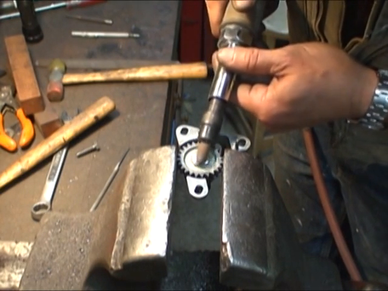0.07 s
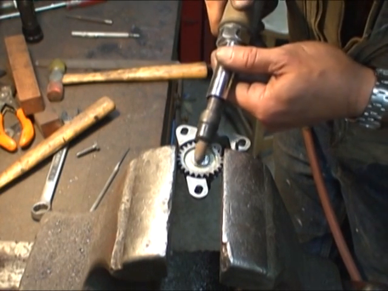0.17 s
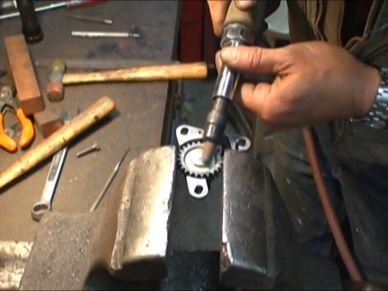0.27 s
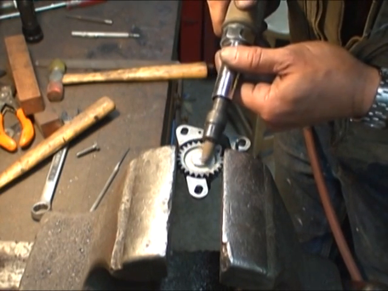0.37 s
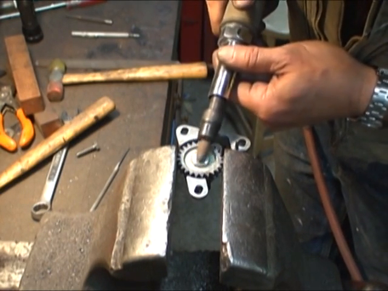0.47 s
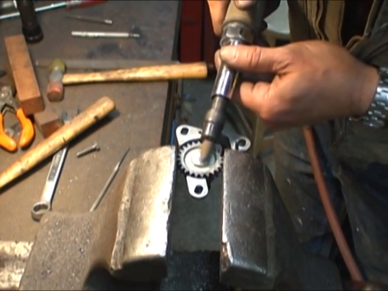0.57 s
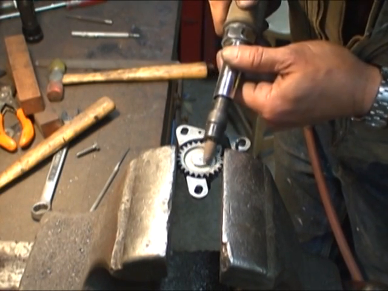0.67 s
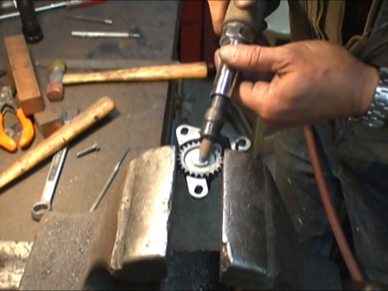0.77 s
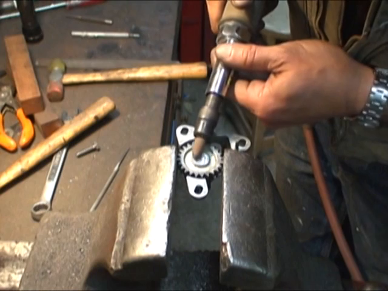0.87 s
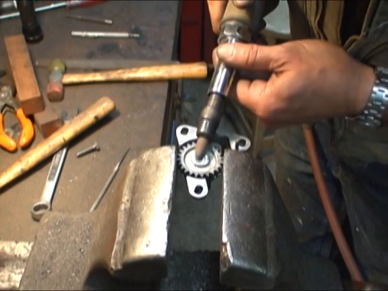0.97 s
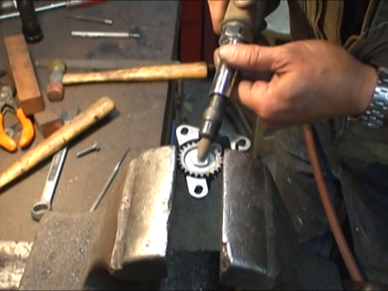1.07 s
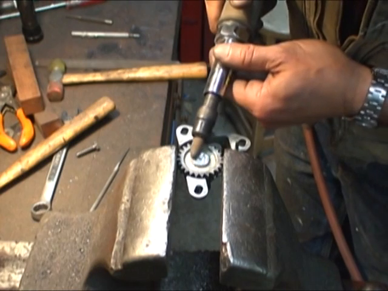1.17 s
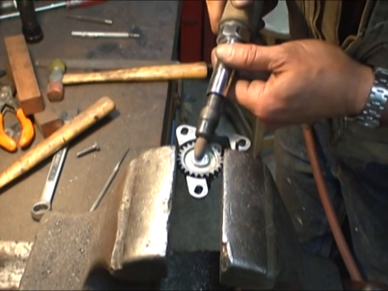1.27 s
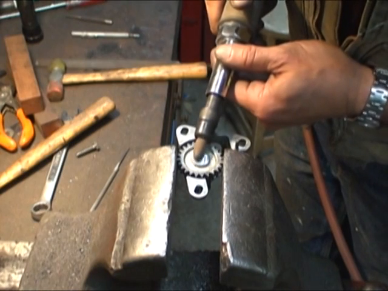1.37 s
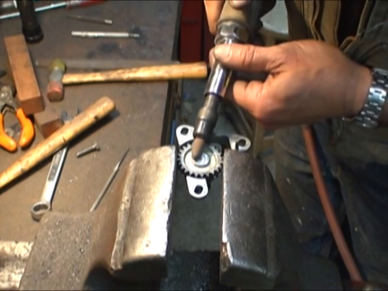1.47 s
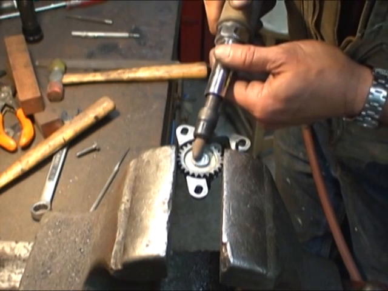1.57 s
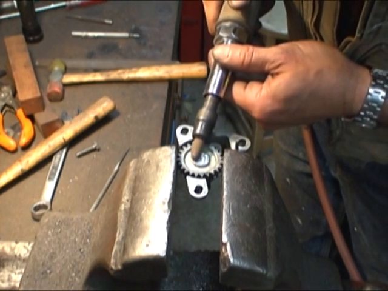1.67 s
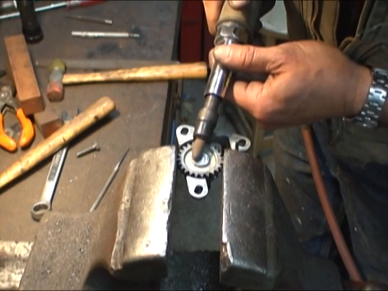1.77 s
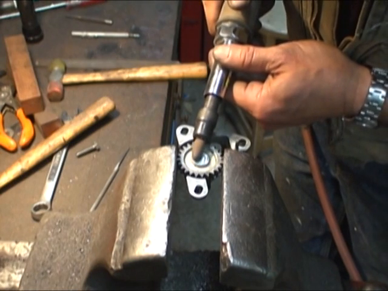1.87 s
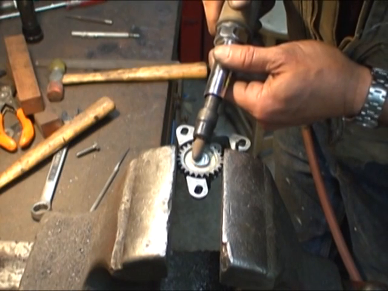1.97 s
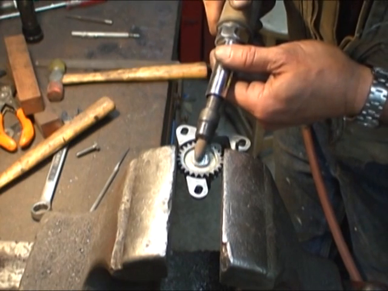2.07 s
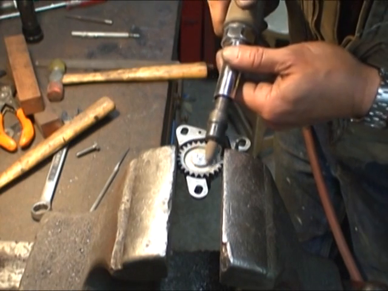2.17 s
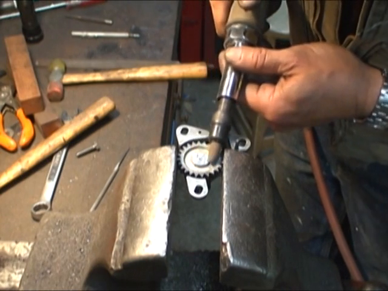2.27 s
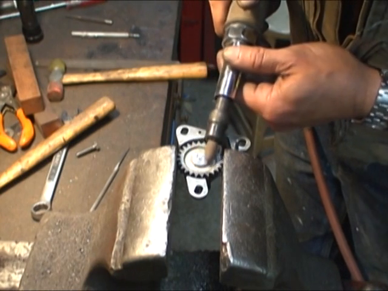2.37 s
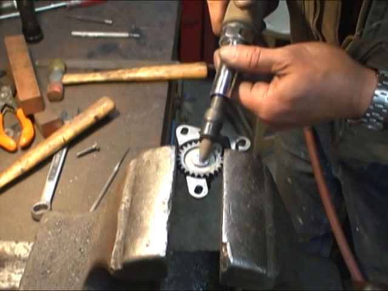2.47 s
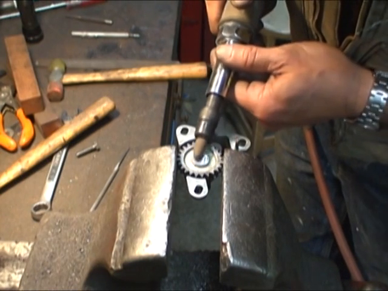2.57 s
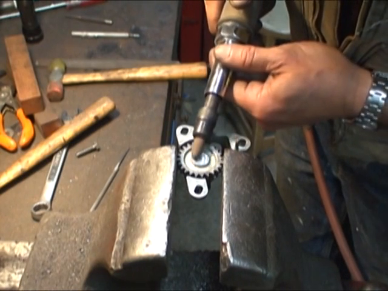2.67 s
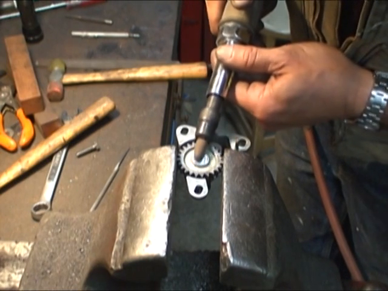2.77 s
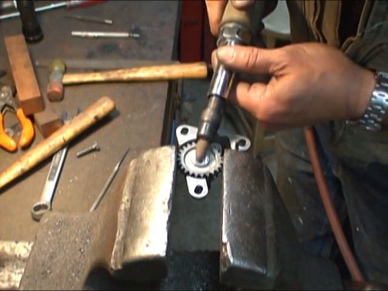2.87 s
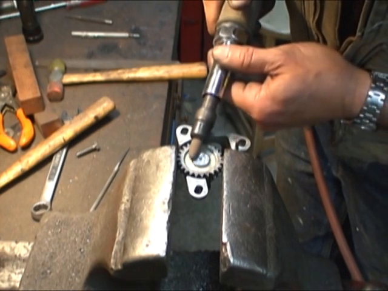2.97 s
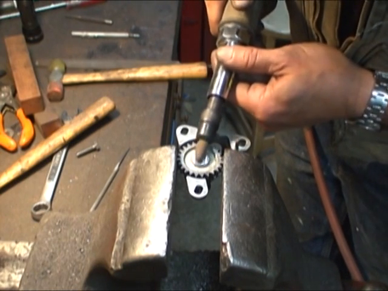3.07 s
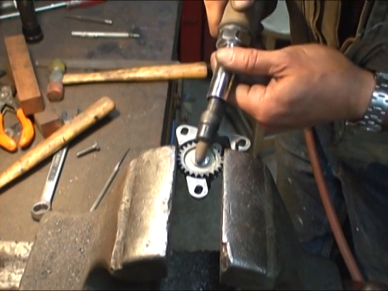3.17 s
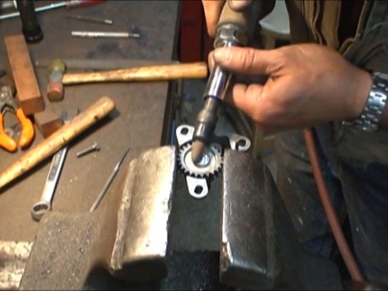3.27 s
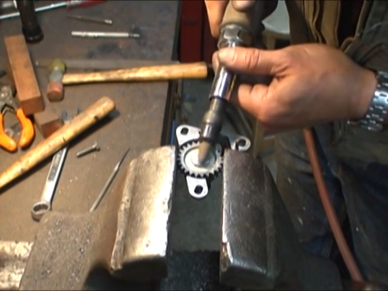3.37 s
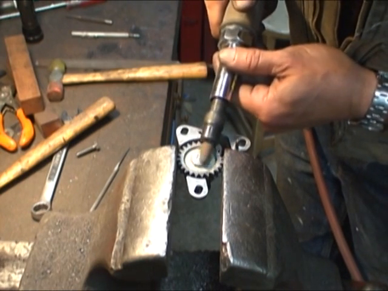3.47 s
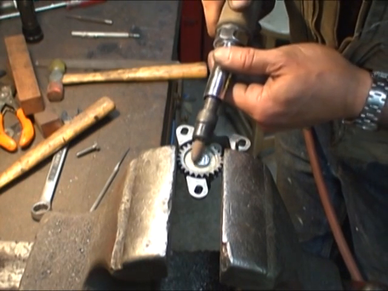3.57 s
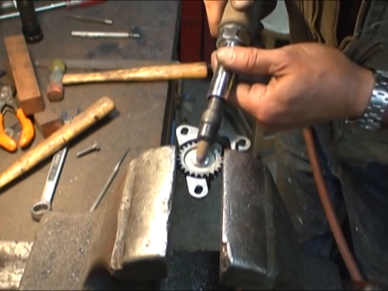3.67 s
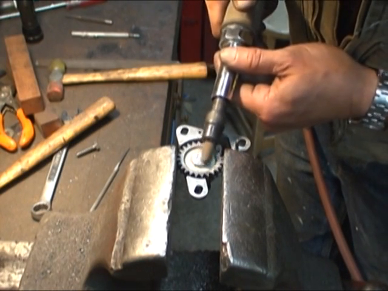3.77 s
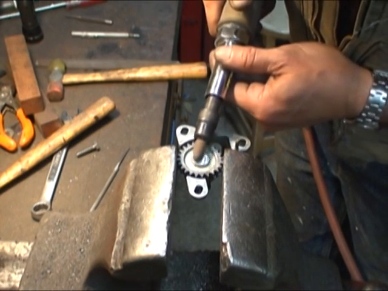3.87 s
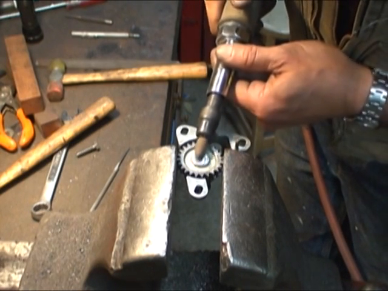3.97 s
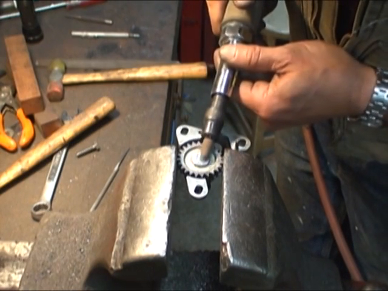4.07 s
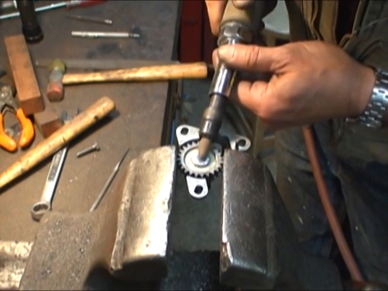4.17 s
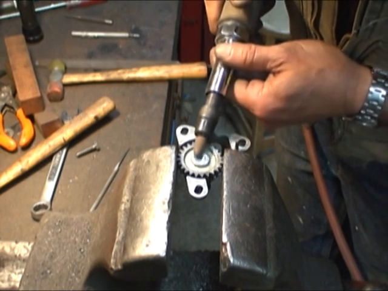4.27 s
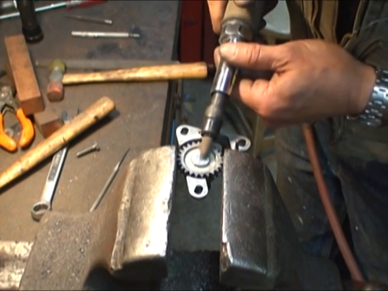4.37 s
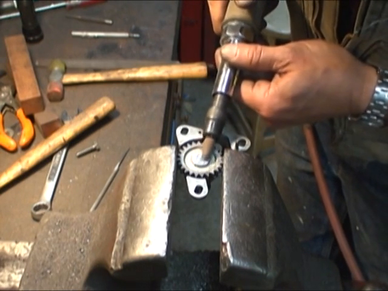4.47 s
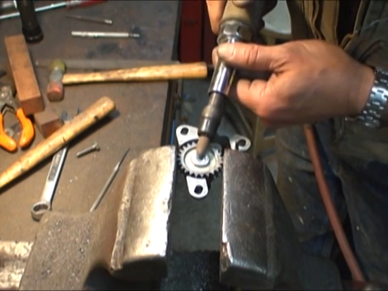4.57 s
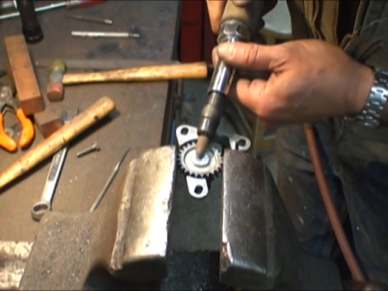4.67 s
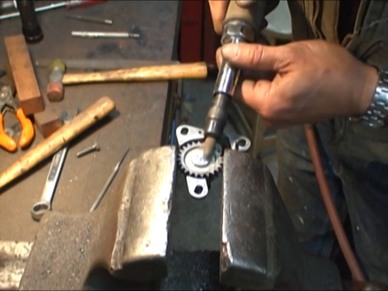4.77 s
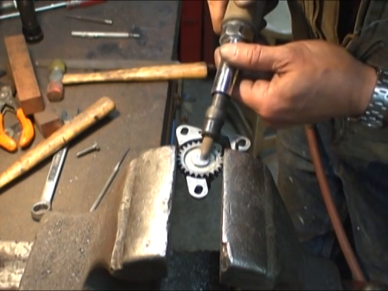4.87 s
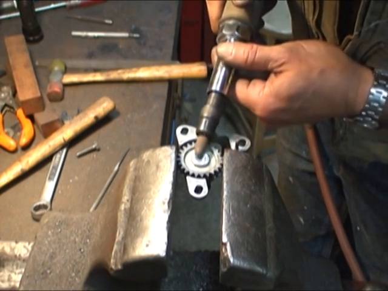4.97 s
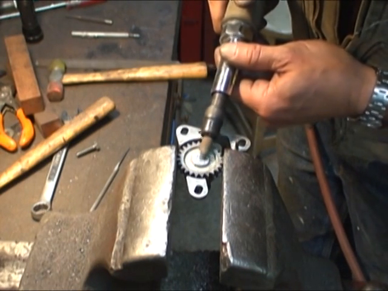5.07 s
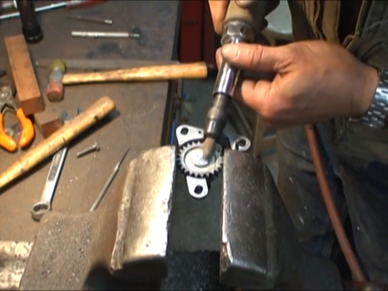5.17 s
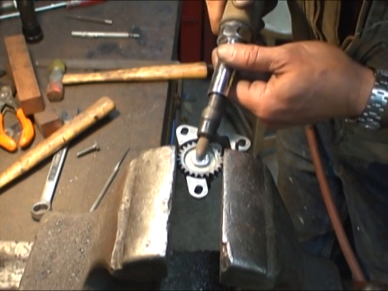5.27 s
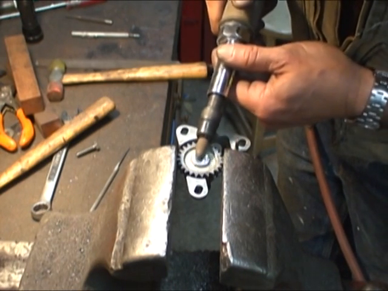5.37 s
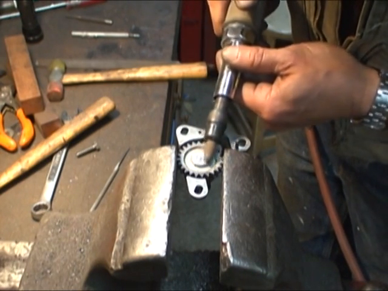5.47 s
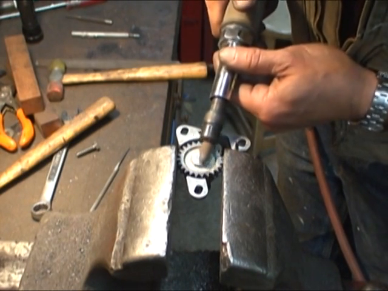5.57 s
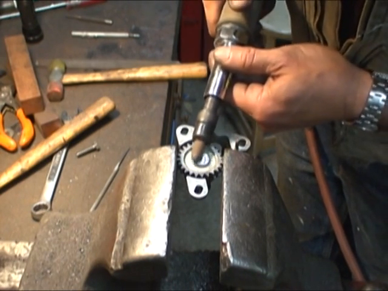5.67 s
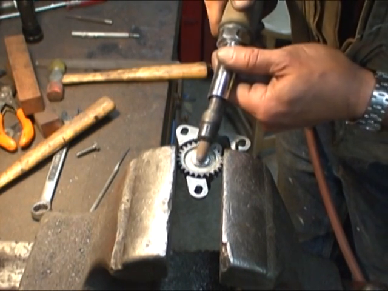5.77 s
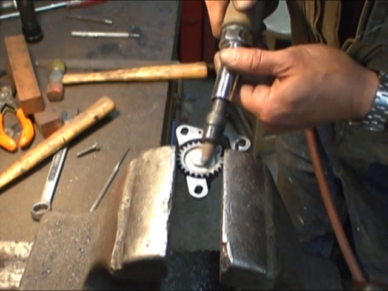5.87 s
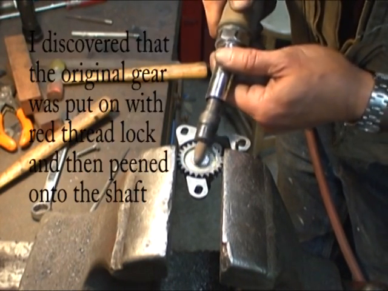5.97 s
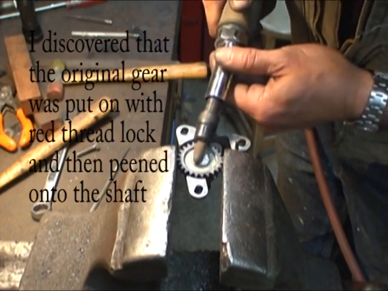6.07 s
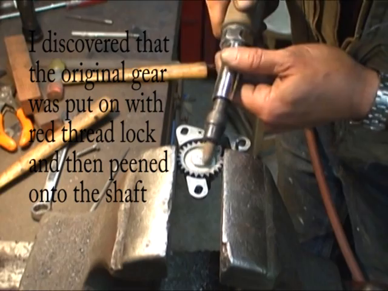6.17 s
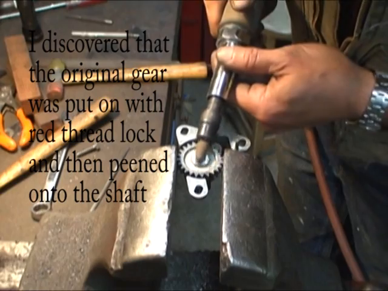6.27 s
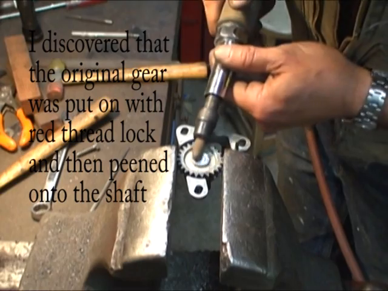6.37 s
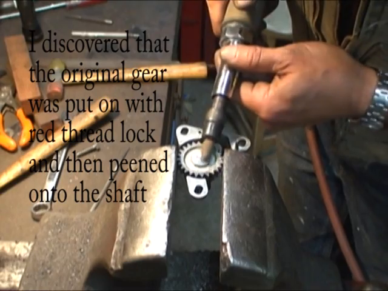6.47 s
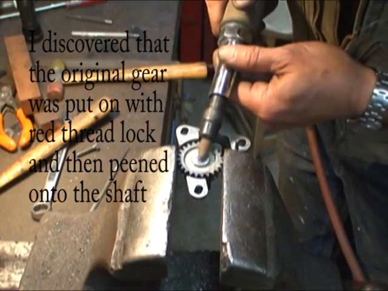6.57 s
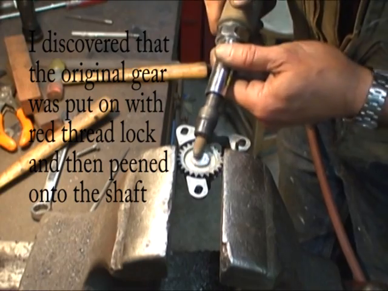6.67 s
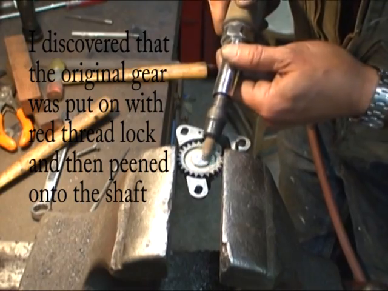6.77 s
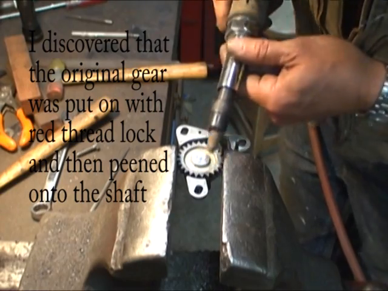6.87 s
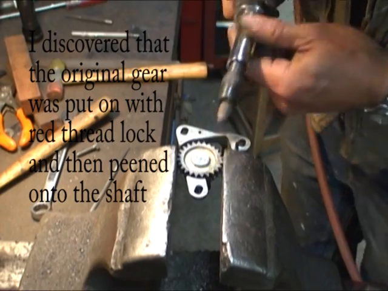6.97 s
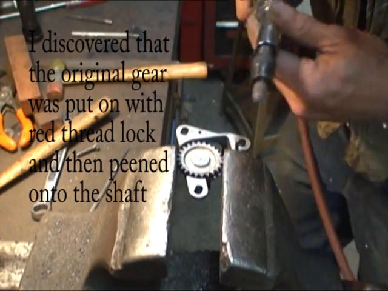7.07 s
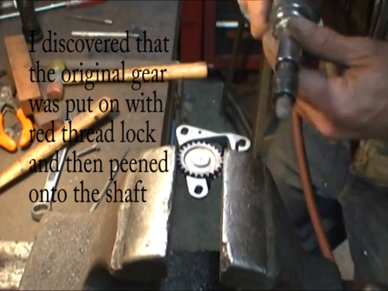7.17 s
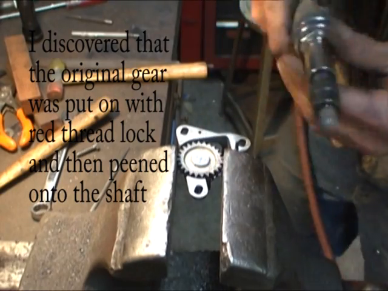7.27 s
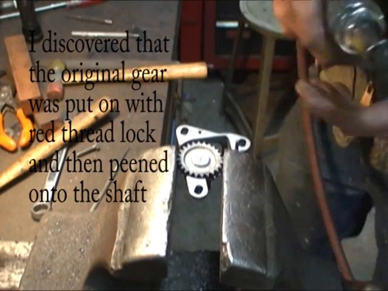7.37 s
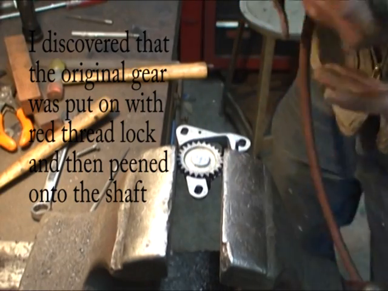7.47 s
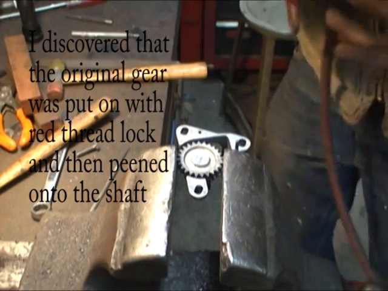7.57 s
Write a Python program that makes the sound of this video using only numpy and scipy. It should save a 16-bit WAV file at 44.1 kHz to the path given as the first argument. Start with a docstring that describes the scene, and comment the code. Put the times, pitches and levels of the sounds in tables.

```python
"""A four-vane air motor in a die grinder whines: gliding shaft orders as sines, coloured by fixed resonances.
Its exhaust hisses in puffs (shaped noise) while the stone grinds a steel gear held in a vice (ticks, noisy ring).
The throttle dips once and is let go near the end; the tool is lifted away with small clicks and a rustle.
A short room tail follows the whine, over the noise floor of a quiet workshop."""
import sys
import numpy as np
from scipy import signal
from scipy.fft import irfft, next_fast_len
from scipy.io import wavfile
from scipy.ndimage import uniform_filter1d

SR = 44100
rng = np.random.default_rng(int(sys.argv[2]) if len(sys.argv) > 2 else 0)


def digitize_waveform(pressure):
    """Quantize a signal to 16-bit integers and store it at the path in sys.argv[1].

    Rows of a 2-D input are taken as channels; values are limited to [-1, 1].
    """
    field = np.atleast_2d(pressure).T
    bounded = np.clip(field, -1, 1)
    quanta = np.round(bounded * 32767).astype(np.int16)
    wavfile.write(sys.argv[1], SR, quanta)


N = 336042
T = np.arange(N) / SR  # s
VANES = 4
PIPE_LAG_S = 0.02  # air trails the lever
AIR_FULL_DB = -23  # hiss at full throttle and usual speed


def gain_of(db):
    """Decibels to an amplitude factor."""
    return 10 ** (np.asarray(db) / 20)


def evened(x):
    """Scales to rms 1."""
    return x / np.sqrt(np.mean(x ** 2) + 1e-20)


def read(points, hz):
    """Interpolates a table on a log-frequency axis."""
    point_hz, value = np.transpose(points)
    return np.interp(np.log(hz + 1), np.log(point_hz + 1), value)


def curve(rows):
    """A (time, value) table as one value per sample."""
    time_s, value = np.transpose(rows)
    return np.interp(T, time_s, value)


def wander(seconds):
    """Slow random drift of about rms 1: white steps averaged twice over the given time."""
    steps = rng.standard_normal(N // 64 + 2)
    size = max(round(seconds * SR / 64), 1)
    smooth = uniform_filter1d(uniform_filter1d(steps, size), size)
    return np.interp(np.arange(N) / 64, np.arange(len(steps)), evened(smooth))


def resonate(x, hz, width_hz):
    """One-pole resonance of gain about 1: shifts hz down to zero, smooths, shifts back."""
    turn = np.exp(2j * np.pi * hz * T[:x.shape[-1]])
    pole = np.exp(-np.pi * width_hz / SR)
    return 2 * (turn * signal.lfilter([1 - pole], [1, -pole], x / turn)).real


# Left-right likeness of noise: (frequency [Hz], correlation [0-1])
LIKENESS = [(40, 0.34), (200, 0.75), (3000, 0.68), (6000, 0.6), (11000, 0.38)]


def noise(tone, patchy_db):
    """Two-channel coloured noise of rms 1, with patches drifting in time and frequency."""
    frames, hz = N // 128 + 5, np.fft.rfftfreq(512, 1 / SR)
    a, b, c, d, patches = rng.standard_normal((frames, 257, 5)).T
    patches = evened(uniform_filter1d(uniform_filter1d(patches, 6, 0), 20, 1))
    same = np.clip(read(LIKENESS, hz), -1, 1)[:, None]
    left = a + 1j * b
    right = same * left + np.sqrt(1 - same ** 2) * (c + 1j * d)
    colour = gain_of(read(tone, hz)[:, None] + patchy_db * patches)
    spectrum = np.array([left, right]) * colour
    return evened(signal.istft(spectrum, nperseg=512, noverlap=384)[1][:, :N])


# Throttle lever, eased once: (time [s], opening [0-1])
THROTTLE_LEVER = [(2.075, 1.0), (2.185, 0.87), (2.268, 0.27), (2.54, 0.36), (2.595, 0.6), (2.62, 0.96),
                  (2.72, 0.84), (3.0, 1.0)]


def throttle():
    """Lever opening, closing fully when it is let go."""
    shut_s, closing_s = 6.918, 0.053
    return np.clip(curve(THROTTLE_LEVER), 0, 1.1) * np.clip((shut_s - T) / closing_s, 0, 1)


def lag(opening, seconds):
    """First-order lag behind a control that starts fully open."""
    keep = np.exp(-1 / (seconds * SR))
    return 1 + signal.lfilter([1 - keep], [1, -keep], opening - 1)


# Shaft speed at full throttle, set by how hard the stone presses: (time [s], speed [Hz])
LOADED_SPEED = [(0.0, 215), (0.12, 215.3), (0.32, 203.7), (0.43, 207.6), (0.63, 197.5), (0.8, 200.8),
                (0.94, 199.8), (1.02, 202), (1.21, 203.2), (1.55, 237.4), (1.83, 236.7), (1.93, 225.9),
                (2.06, 229.2), (3.13, 205.7), (3.21, 205.4), (3.3, 198.3), (3.55, 200.2), (3.64, 196.3),
                (3.76, 193.9), (3.87, 202.3), (3.98, 196.8), (4.14, 204.4), (4.33, 202.7), (4.47, 211.4),
                (4.7, 208.8), (4.8, 215.3), (4.92, 229.4), (5.11, 231), (5.26, 242.6), (5.42, 238.8),
                (5.65, 238.1), (5.73, 233.8), (5.79, 237.5), (5.97, 243.2), (6.09, 239.5), (6.34, 240.7),
                (6.61, 242.3), (6.69, 240.1), (6.83, 242.4)]


def controls():
    """Shaft speed, vane pulse level and air level, all from load and lagged throttle."""
    rotor_lag_s, chamber_lag_s = 0.12, 0.056
    creep = 0.08  # share of speed kept while coasting
    starve = 0.079  # pulses fade once chamber pressure falls under this share
    leak, leak_s = 0.36, 0.083  # share of trapped air; time constant of each bleed stage
    pulse_full_db, spin_power, surge, drift_db = -22, 0.69, 3.4, 0.69
    air_db_per_hz, usual_hz, overrun_db = 0.02, 215, 18

    loaded_hz, opening = curve(LOADED_SPEED), throttle()
    spin, supply, chamber = (np.maximum(lag(opening, s), 1e-6)
                             for s in (rotor_lag_s, PIPE_LAG_S, chamber_lag_s))
    hz = loaded_hz * (creep + (1 - creep) * spin)

    pulses = spin ** spin_power * chamber * (1 + starve) / (chamber + starve)
    pulses = pulses + surge * np.maximum(supply - spin, 0)  # surge while the rotor catches up
    pulse_db = pulse_full_db + 20 * np.log10(pulses) + drift_db * wander(0.22)

    flow = (1 - leak) * supply + leak * lag(lag(opening, leak_s), leak_s)
    air_db = AIR_FULL_DB + 20 * np.log10(abs(flow) + 1e-6)
    air_db = air_db + air_db_per_hz * (loaded_hz - usual_hz)  # louder as the load lightens
    air_db = air_db - overrun_db * np.maximum(spin - supply, 0)  # thins as the rotor outruns its supply
    return hz, pulse_db, air_db


# Resonances of tool, gear, vice and bench:
# (frequency [Hz], width where the level is 4 dB down [Hz], peak level [dB])
BODY_MODES = [(210.5, 9.9, -3.5), (318, 113, -9), (411, 10.6, -5), (548, 82, -10.5), (594, 22, -4.5),
              (703, 51, -6), (849, 40, -5), (950, 39, -9.5), (1363, 200, -2.5), (1650, 34, -2.5),
              (1754, 170, -10.5), (1928, 65, -7), (2340, 87, -10), (2428, 52, -10), (2645, 48, -3.5),
              (2778, 35, 4), (2819, 45, 0), (2957, 175, -3), (3184, 81, -9.5), (3315, 87, -3),
              (3440, 40, -1), (3660, 57, -5), (3830, 59, -5), (4050, 300, -5.5), (4430, 190, -9),
              (4760, 26, -9.5), (5770, 820, -6.5), (10000, 718, -3)]


def body(hz):
    """Gain of the fixed resonances at a moving frequency, summed as power over a -22 dB base."""
    power = sum(gain_of(2 * db) / (1 + (2 * (hz - mode_hz) / width_hz) ** 2) ** 1.32
                for mode_hz, width_hz, db in BODY_MODES)
    return np.sqrt(power + gain_of(2 * -22))


# Vane tones: (shaft order [1], level before the common +2.06 dB [dB])
VANE_ORDERS = [(4, 0), (16, 0), (20, -2), (24, -8), (28, -9), (32, -15), (40, -22)]
# Weaker orders from uneven vanes and the stone's run-out: (shaft order [1], level [dB])
UNEVEN_ORDERS = [(1, -17), (2, -14.5), (3, -21), (5, -19.5), (7, -22), (9, -19.5), (11, -8.5), (13, -14),
                 (14, -13.5), (17, -12.5), (19, -13), (26, -13.5), (40, -11)]


def motor(hz, angle, pulse_db):
    """Shaft orders as sines, every fourth a vane tone; each swells as it glides through a resonance."""
    out, step = np.zeros(N), np.arange(0, N, 64)
    # without supply the pulses are round: their overtones drop
    soft = np.clip(1 - lag(throttle(), PIPE_LAG_S) / 0.325, 0, 1)
    # a gliding tone crosses the room's standing waves, breaks up and blurs; 1 at 400 Hz/s
    glide = np.clip(abs(uniform_filter1d(np.gradient(hz), 2000)) * SR / 400, 0, 1)
    for order in range(1, 41):
        overtone = order / VANES
        if order % VANES:  # less steady the higher the order
            db = read(UNEVEN_ORDERS, order) + min(0.54 * order, 3.2) * wander(0.046)
        else:  # mostly steady, with brief dropouts
            db = read(VANE_ORDERS, order) + 2.06 - min(0.21 * order, 3.2) * wander(0.033) ** 2
        db = db - 4.13 * glide * abs(wander(0.018))
        db = db - 1.1 * glide * np.log2(overtone + 1)
        db = db - 3.9 * soft * np.log2(max(overtone, 1))
        colour = np.interp(np.arange(N), step, body(order * hz[step]))
        tone = np.cos(order * angle + 2 * np.pi * rng.random())
        out += np.sqrt(2) * gain_of(db) * colour * tone
    return out * gain_of(pulse_db)


# Exhaust hiss colour: (frequency [Hz], relative density [dB per Hz])
HISS_TONE = [(24, -71), (40, -69), (158, -29), (218, -22), (273, -27), (398, -18.5), (906, -21.5),
             (1420, -18), (1820, -16), (2720, -3.5), (3580, -9.5), (5470, -4.5), (7020, -8), (9950, -4),
             (15600, -14.5)]
# Noisy gear and tool ring: (frequency [Hz], resonance width per pass [Hz],
# level before the common -28.5 dB [dB], share of the air's level change in dB that it follows [1])
GEAR_RING = [(1436, 220, -22, 0.44), (2905, 160, -15, 0.57), (5570, 760, -10.5, 0.81),
             (10070, 410, -7, 4.8), (14030, 2150, -0.5, 1.04)]


def exhaust(angle, air_db):
    """Hiss that puffs with each vane and turn; grit ticks in the treble; the gear and tool ring."""
    puffs = evened(1 + 0.12 * np.cos(angle) + 0.19 * np.cos(VANES * angle))
    tick_size = gain_of(1.7 * np.minimum(rng.exponential(1, (2, N)), 4))
    ticks = tick_size * (rng.random(N) < 600 / SR)  # about 600 per second
    grit = evened(resonate(resonate(ticks, 8600, 2400), 8600, 2400))
    hiss = noise(HISS_TONE, patchy_db=1.5) * puffs + gain_of(-16.5) * grit

    drive = noise([(20, 0.018), (20000, 0.0067)], patchy_db=3.0) * puffs  # nearly white
    ring = np.zeros((2, N))
    for hz, width_hz, db, share in GEAR_RING:
        mode = evened(resonate(resonate(drive, hz, width_hz), hz, width_hz))
        ring += gain_of(db - 28.5 + share * (air_db - AIR_FULL_DB)) * mode
    return gain_of(air_db + 0.79 * wander(0.012)) * hiss + ring


# Handling clicks: (time [s], peak level [dB], pitch [Hz], resonance width per pass [Hz])
HANDLING_CLICKS = [(7.151, -30, 7140, 2489), (7.153, -20.5, 12500, 3500), (7.3423, -45, 1900, 1500),
                   (7.418, -44, 3200, 400), (7.4246, -38, 3900, 600), (7.5543, -45, 7800, 1496)]
# Sleeve or hose rustle: (time [s], level [dB])
RUSTLE_LEVEL = [(7.339, -75), (7.343, -52), (7.38, -50), (7.425, -50), (7.46, -61)]
# Rustle colour: (frequency [Hz], relative density [dB per Hz])
RUSTLE_COLOUR = [(150, -12), (500, -5), (2000, -7), (5000, -10), (15000, -18)]


def handling():
    """Clicks (decaying noise through a resonance) and a noise rustle as the tool is lifted."""
    out, t = np.zeros(N), T[:1500]
    for time_s, peak_db, hz, width_hz in HANDLING_CLICKS:
        burst = rng.standard_normal(1500) * np.exp(-t / 0.0026)
        click = resonate(resonate(burst, hz, width_hz), hz, width_hz)
        out[round(time_s * SR):][:1500] += gain_of(peak_db) * click / abs(click).max()
    inside = (T > RUSTLE_LEVEL[0][0]) & (T < RUSTLE_LEVEL[-1][0])
    return out + noise(RUSTLE_COLOUR, patchy_db=4.5) * gain_of(curve(RUSTLE_LEVEL)) * inside


# Room decay: (frequency [Hz], time to fall 60 dB [s])
ROOM_T60 = [(200, 0.38), (1500, 0.24), (5000, 0.27), (12000, 0.022)]


def room(x):
    """Sparse taps of random sign, each band dying at its own speed, other taps per channel."""
    taps = np.zeros((2, SR))
    at = np.arange(200, SR - 20, 20) + rng.integers(0, 20, (2, (SR - 201) // 20))
    np.put_along_axis(taps, at, rng.choice([-1., 1.], at.shape), 1)
    hz, t, spectrum = signal.stft(taps, SR, nperseg=256)
    decay = gain_of(-60 * t / read(ROOM_T60, hz)[:, None])
    tail = signal.istft(spectrum * decay, SR, nperseg=256)[1]
    return signal.fftconvolve(x[None], tail / np.linalg.norm(tail[0]), axes=1)[:, :N]


# Workshop floor colour: (frequency [Hz], relative density [dB per Hz])
FLOOR_TONE = [(18, -83), (30, -50), (73, -34), (130, 2), (258, -14), (392, -1), (483, -9), (7580, -23),
              (15800, -19)]


def workshop_floor():
    """Steady coloured noise of the quiet workshop."""
    return gain_of(-53.5) * noise(FLOOR_TONE, patchy_db=1.0)


def scene():
    """Motor with its room tail, exhaust, handling and the workshop floor."""
    hz, pulse_db, air_db = controls()
    hz = hz * (1 + 0.00294 * wander(0.008))
    angle = 2 * np.pi * np.cumsum(hz) / SR
    whine = motor(hz, angle, pulse_db)
    # the tones meet the two microphones out of step
    quadrature = signal.hilbert(whine, next_fast_len(N))[:N].imag
    skew = gain_of(-14.5) * quadrature * [[1], [-1]]
    mix = whine + skew + gain_of(-11.0) * room(whine)
    return mix + exhaust(angle, air_db) + handling() + workshop_floor()


# Stereo tilt by band: (frequency [Hz], left minus right [dB])
STEREO_TILT = [(60, 3.5), (250, -3.5), (700, -0.5), (1400, 3), (2800, -4), (5000, -0.6), (10500, -0.5)]


def record(dry):
    """Tilts left against right by band, narrows the pair nearly to mono above 10.9 kHz; then the band limit."""
    mono_hz, edge_hz = 10900, 15770
    half_db = read(STEREO_TILT, np.fft.rfftfreq(1024, 1 / SR)) / 2
    taps = np.fft.fftshift(irfft(gain_of([half_db, -half_db])), 1) * np.hanning(1024)
    left, right = signal.oaconvolve(dry, taps, "same", axes=1)
    narrow = signal.firwin(511, mono_hz, fs=SR)
    side = signal.oaconvolve((left - right) / 2, narrow, "same")
    side = side + 0.0027 * (left - right)  # the treble is almost mono
    pair = (left + right) / 2 + side * [[1], [-1]]
    band_limit = signal.firwin(2047, edge_hz, window=("kaiser", 6), fs=SR)
    return signal.oaconvolve(pair, band_limit[None], "same")


dry = scene()
out = record(dry)
digitize_waveform(out)
```